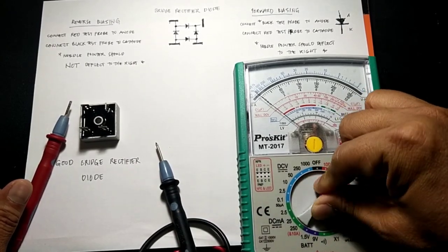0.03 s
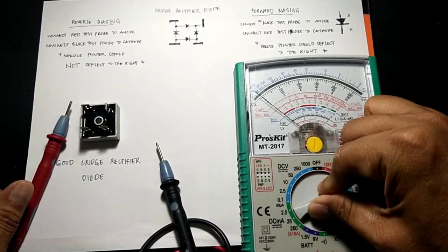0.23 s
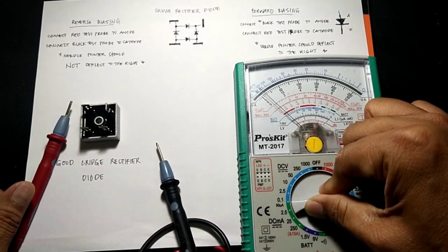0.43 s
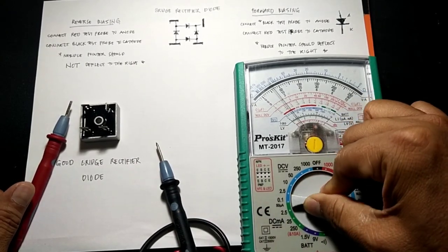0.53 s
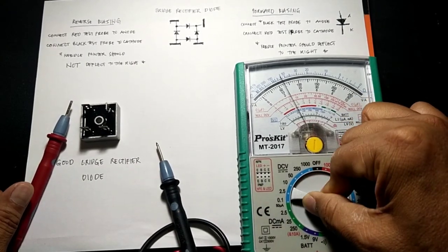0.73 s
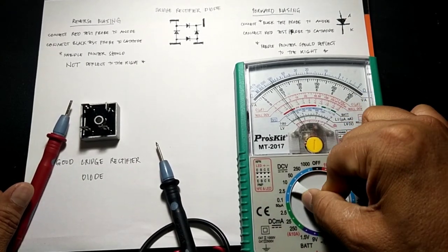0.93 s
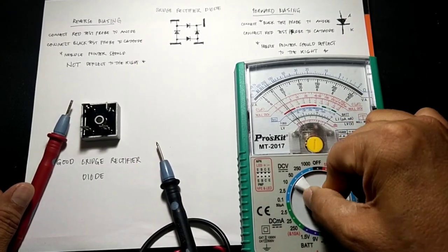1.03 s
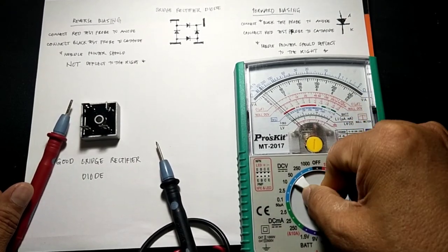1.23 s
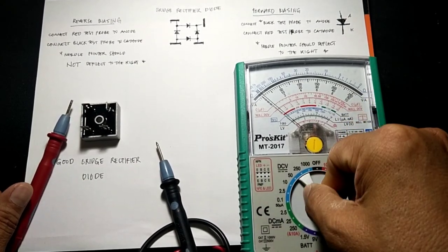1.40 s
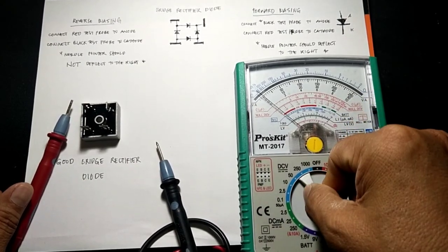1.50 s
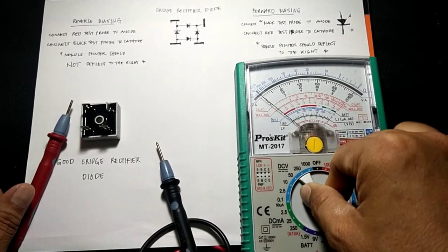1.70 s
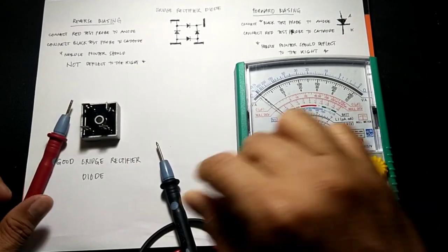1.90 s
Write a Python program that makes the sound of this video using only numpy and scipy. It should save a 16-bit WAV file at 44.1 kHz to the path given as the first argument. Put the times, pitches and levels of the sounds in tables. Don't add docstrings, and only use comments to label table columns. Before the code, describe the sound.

Crisp ratcheting clicks from a meter's rotary switch, eight in under a second and a half, each with a brief hollow knock; faint skin rubs between, light taps afterwards, close up indoors over low rumble and hiss.

```python
import sys
import numpy as np
from scipy import signal
from scipy.fft import rfft, irfft
from scipy.io import wavfile
from scipy.ndimage import uniform_filter1d

SR = 44100
rng = np.random.default_rng(int(sys.argv[2]) if len(sys.argv) > 2 else 0)


def nominal_scale(level):
    x = np.asarray(level, float) / 20
    return 10 ** x


def store_wav(level_fs):
    pcm = np.round(np.clip(np.atleast_2d(level_fs), -1, 1) * 32767)
    wavfile.write(sys.argv[1], SR, pcm.T.astype(np.int16))


N = 85995
HISS_TOP_HZ = 15500
LEAD_S = 0.14


def noise(n):
    return rng.standard_normal(n)


def colour(x, points):
    hz, db = np.array(points).T
    f = np.fft.rfftfreq(len(x), 1 / SR)
    gain = nominal_scale(np.interp(np.log(f + 1), np.log(hz), db))
    return irfft(rfft(x) * gain, len(x))


def unit(x):
    return x / np.sqrt(np.mean(x ** 2))


def band(x, hz, width_hz):
    return signal.lfilter(*signal.iirpeak(hz, hz / width_hz, fs=SR), x)


def low_pass(x, order, hz):
    return signal.lfilter(*signal.butter(order, hz, fs=SR), x)


def cut(x, hz):
    return signal.sosfilt(signal.ellip(12, .3, 90, hz, fs=SR, output="sos"), x)


def fade(t, t60):
    return (t >= 0) * np.exp(-np.log(1000) * np.maximum(t, 0) / t60)


def walk(rate):
    k = int(SR / rate)
    steps = np.repeat(noise(N // k + 1), k)
    return unit(uniform_filter1d(steps, k)[:N])


def add(out, x, s):
    i = int(s * SR)
    out[max(i, 0):i + len(x)] += x[max(-i, 0):N - i]


def ring(t, modes, push_s=0.002172):
    scatter_db, detune = 1.5, 0.008
    out = np.zeros(len(t))
    for hz, db, t60 in modes:
        level_db = db + scatter_db * rng.standard_normal()
        pitch = hz * (1 + detune * rng.standard_normal())
        out += nominal_scale(level_db) * fade(t, t60) * np.sin(2 * np.pi * pitch * np.maximum(t, 0))
    return out * np.sin(np.pi / 2 * np.clip(t / push_s, 0, 1)) ** 2


def snap(t, tilt_db, release_db, rebound_db):
    # frequency in Hz, level in dB.
    snap_colour = [(880, -10.5), (1500, 4), (3030, -3), (4430, 2), (6430, -2.5), (10900, -2),
                   (13100, -16.5), (14600, -11.5), (16500, -33)]
    rise_s, t60_s = 0.001014, 0.00483
    release_lead_s, release_t60_s = 0.0023, 0.014
    rebound_gap_s, rebound_t60_s = 0.0018, 0.00677
    rise = (t < rise_s) * (t > 0) * (.5 + .5 * t / rise_s)
    shape = rise + fade(t - rise_s, t60_s)
    shape += nominal_scale(release_db) * fade(t + release_lead_s, release_t60_s)
    rebounds = np.cumsum(rebound_gap_s * (.5 + rng.random(5)))
    for k, late in enumerate(rebounds):
        shape += nominal_scale(rebound_db - 3.36 * k) * fade(t - late, rebound_t60_s)
    tilted = [(hz, db + tilt_db * np.log2(hz / 5000)) for hz, db in snap_colour]
    return shape * unit(colour(noise(len(t)), [(900, -25.5)] + tilted))


def case_ring(t, pitch, boom_db, lid_db, knock_db):
    # frequency in Hz, level in dB, t60 in seconds.
    boom = [(736.2, 7, 0.0351), (672, -8.5, 0.0564), (844, -17.5, 0.088)]
    # frequency in Hz, level in dB, t60 in seconds.
    lid = [(1517, -0.5, .03), (1427.7, -6, 0.023), (2323, -13, 0.019)]
    # frequency in Hz, level in dB, t60 in seconds.
    knock = [(484.5, -4.5, 0.0347), (555.3, -1.5, 0.0332), (991, -3, 0.0352)]
    # frequency in Hz, level in dB, t60 in seconds.
    bright = [(3577, -16, 0.1643), (4024, -10, 0.16), (3402, -20.5, 0.16), (4295, -4.5, 0.0683),
              (4990, -26.5, 0.12), (5185, -20, 0.021), (7219, -4, 0.048), (8056, -44, 0.026),
              (10185, -20, 0.016)]
    bright_db, thump_db, thump_hz = -11, -33.5, 76.6
    rattle = nominal_scale(2 * walk(500)[:len(t)])
    out = nominal_scale(bright_db) * rattle * ring(t, bright)
    out += nominal_scale(boom_db) * ring(t, boom)
    out += nominal_scale(lid_db) * ring(t, [(hz * pitch, db, t60) for hz, db, t60 in lid], push_s=0.000559)
    out += nominal_scale(knock_db) * ring(t, knock)
    return out + nominal_scale(thump_db) * ring(t, [(thump_hz, 0, .12)])


def drag(t, drag_db):
    climb_db, climb_s, climb_hz, drag_s = -34.5, 0.0071, 623.5, 0.0934
    climb = nominal_scale(climb_db) * np.exp(-np.abs(t) / climb_s)
    slide = nominal_scale(drag_db) * np.exp(-(t / drag_s) ** 2)
    scrape = band(band(noise(len(t)), climb_hz, 760), climb_hz, 760)
    return (climb + slide) * unit(scrape)


def room(t, boom_db=0):
    # frequency in Hz, level in dB.
    room_colour = [(180, -29.5), (300, -23), (708, -2), (849, -10), (1540, -18.5), (2040, -21),
                   (3870, -16.5), (10100, -23), (15500, -36)]
    t60_s, treble_t60_s, build_s = 0.2126, 0.1734, 0.0087
    tail = unit(colour(noise(len(t)), [(150, -31)] + list(room_colour)))
    tail = cut(tail + (nominal_scale(boom_db) - 1) * band(tail, 770, 220), HISS_TOP_HZ)
    low = low_pass(tail, 1, 5000)
    decayed = low * fade(t, t60_s) + (tail - low) * fade(t, treble_t60_s)
    return decayed * np.clip(t / build_s, 0, 1)


def detents():
    # start in seconds, snap peak in dB, then case boom, lid ring and low knock in dB re the snap.
    steps = [
        (0.0558, -21.5, -12.5, -5.5, -2.5),
        (0.1593, -20.5, -5, -9.5, -7),
        (0.31, -21.5, -7.5, -9, -4.5),
        (0.5217, -22, -4, -9, -35.5),
        (0.7139, -21.5, -1, -15.5, -18),
        (0.9274, -23, -0.5, -14, -15.5),
        (1.0933, -22.5, -2, -4, -12),
        (1.3593, -24, -7, -7, -28.5),
    ]
    # lid pitch as a factor, treble tilt in dB per octave, release tick in dB, rebound in dB,
    # drag around the snap in dB.
    notches = [(1.2, -0.5, -16, -7, -39.5), (1.078, 0.5, -14.5, -8, -47), (0.9895, -1, -19.5, -7.5, -40.5),
               (.9, 0, -12, -12, -36.5), (2.7, -0.5, -8, -6, -36), (1.03, 0.5, -13.5, -6, -46),
               (1.0273, 1, -15, -8, -42.5), (0.969, -1, -8.5, -7, -44.5)]
    room_db, room_boom_share = -35.5 + 20, 0.61
    out = np.zeros(N)
    t = np.arange(SR // 2) / SR - LEAD_S
    for step, notch in zip(steps, notches):
        start_s, db, boom_db, lid_db, knock_db = step
        pitch, tilt_db, release_db, rebound_db, drag_db = notch
        click = snap(t, tilt_db, release_db, rebound_db)
        click += case_ring(t, pitch, boom_db, lid_db, knock_db)
        click += drag(t, drag_db)
        click += nominal_scale(room_db) * room(t, room_boom_share * (boom_db + 1))
        add(out, nominal_scale(db) * click, start_s - LEAD_S)
    return out


def earlier_step():
    t = np.arange(SR // 2) / SR
    out = np.zeros(N)
    add(out, nominal_scale(-53) * room(t + 0.0064), 0)
    add(out, nominal_scale(-48.5) * ring(t + 0.00196, [(189.8, 0, .15)]), 0)
    return out


def firm(x):
    dip_hz, dip_share = 316.4, 0.674
    return x - dip_share * band(x, dip_hz, dip_hz / 2)


def finger_taps():
    # start in seconds, peak in dB, pitch in Hz, ring t60 in seconds.
    taps = [
        (0.7806, -32, 657, 0.0301),
        (1.696, -47, 468, 0.0417),
        (1.717, -51, 420, 0.0555),
        (1.7302, -42, 687, 0.0287),
        (1.778, -56.5, 615, 0.0164),
        (0.853, -60.5, 600, 0.0167),
    ]
    out, t = np.zeros(N), np.arange(SR // 10) / SR
    for s, db, hz, t60 in taps:
        modes = [(hz, 0, t60), (hz * 0.6428, -5, t60 * 1.78), (hz * 1.294, -4, t60), (hz * 2, -16, t60)]
        add(out, nominal_scale(db) * ring(t, modes, push_s=0.00194), s)
    return out


def nail_tick():
    # frequency in Hz, level in dB, t60 in seconds.
    nail_modes = [(3232, 2, 0.0137), (2494, -4.5, 0.0158), (3596, -17, 0.015)]
    start_s, tick_db, tail_db, tail_t60_s = 1.7308, -44, -62, 0.188
    scrape_hz, width_hz = 3150, 1000
    out, t = np.zeros(N), np.arange(SR // 10) / SR
    tick = nominal_scale(tick_db) * ring(t, nail_modes, push_s=0.000178)
    scrape = unit(band(band(noise(len(t)), scrape_hz, width_hz), scrape_hz, 2 * width_hz))
    tail = nominal_scale(tail_db) * fade(t, tail_t60_s) * np.clip(t / 0.0042, 0, 1) * scrape
    add(out, tick + tail, start_s)
    return out


def finger_rubs():
    # peak time in seconds, level in dB, length in seconds, centre in Hz.
    rubs = [(.487, -57, 0.0163, 2230), (0.604, -63, 0.0108, 2800), (0.665, -54, 0.00485, 2200),
            (.694, -61.5, 0.0049, 2210), (0.884, -61, 0.0122, 2990), (1.0, -58.5, 0.0183, 1530),
            (1.075, -57, 0.014, 1210), (1.289, -60, 0.01, 2960), (1.341, -66, 0.015, 1205),
            (1.434, -60, 0.0125, 3000), (1.535, -61.5, 0.0086, 1200), (1.56, -63, 0.0152, 3210),
            (1.648, -63, 0.0423, 600), (1.743, -60, 0.049, 1440), (1.822, -61.5, 0.0254, 2470),
            (1.909, -67, 0.0093, 2500)]
    low_hz, peak_s = 466, 0.05
    out, t = np.zeros(N), np.arange(SR // 10) / SR
    for s, db, length, hz in rubs:
        grains = noise(len(t)) * nominal_scale(2 * rng.standard_exponential(len(t)))
        points = [(low_hz / 2, -20), (low_hz, 0), (hz, -6), (hz * 1.8, -26), (hz * 4, -55)]
        haste = np.where(t < peak_s, 2.5, 1)
        swell = np.exp(-np.abs(t - peak_s) / length * haste)
        add(out, nominal_scale(db) * swell * unit(colour(grains, points)), s - peak_s)
    return out


def far_tone():
    # time in seconds, frequency in Hz, level in dB.
    course = [(1.77, 588, -74.5), (1.81, 586.3, -57), (1.86, 610.7, -62.5), (1.90, 625.4, -61.5),
              (1.95, 616, -57)]
    t = np.arange(N) / SR
    at_s, pitch_hz, level_db = np.array(course).T
    hz = np.interp(t, at_s, pitch_hz) * (1 + 0.0041 * walk(30))
    db = np.interp(t, at_s, level_db, left=-120) + 1.5 * walk(40.26)
    return nominal_scale(db) * np.sin(2 * np.pi * np.cumsum(hz) / SR)


def background():
    # frequency in Hz, level in dB.
    floor_colour = [(15, -51.5), (25, 0), (233, -4.5), (509, -16), (1270, -17.5), (1410, -19.5),
                    (2170, -24.5), (3720, -28), (15500, -33)]
    level_db, flicker_db = -62.5, 2
    whole = cut(unit(colour(noise(N), [(4, -6.5)] + list(floor_colour))), HISS_TOP_HZ)
    low = low_pass(whole, 2, 250)
    mid = low_pass(whole - low, 2, 2500)
    hiss = whole - low - mid
    return nominal_scale(level_db) * (low * nominal_scale(flicker_db * walk(8.3)) + mid * nominal_scale(flicker_db * walk(13)) + hiss)


def scene():
    knob = firm(detents() + earlier_step())
    fingers = finger_taps() + nail_tick() + finger_rubs()
    return (knob + fingers + far_tone() + background())[None]


def top_cut(x):
    return signal.sosfilt(signal.butter(12, 16650, fs=SR, output="sos"), x)


def record(dry):
    offset = 0.00093
    mix = cut(dry, 16600) + offset
    return top_cut(mix)


dry = scene()
out = record(dry)
store_wav(out)
```